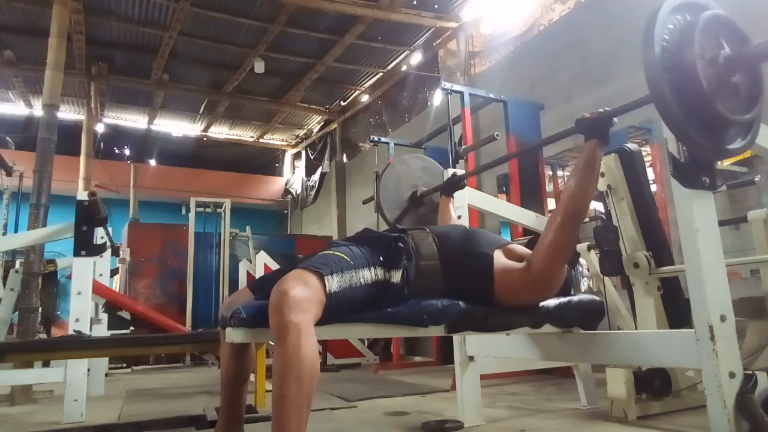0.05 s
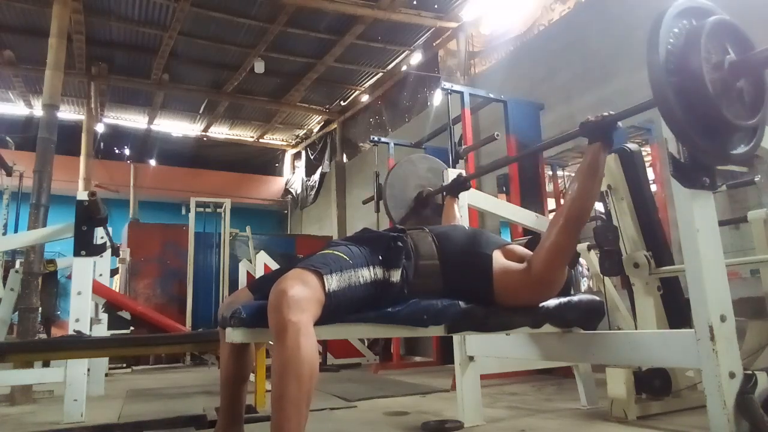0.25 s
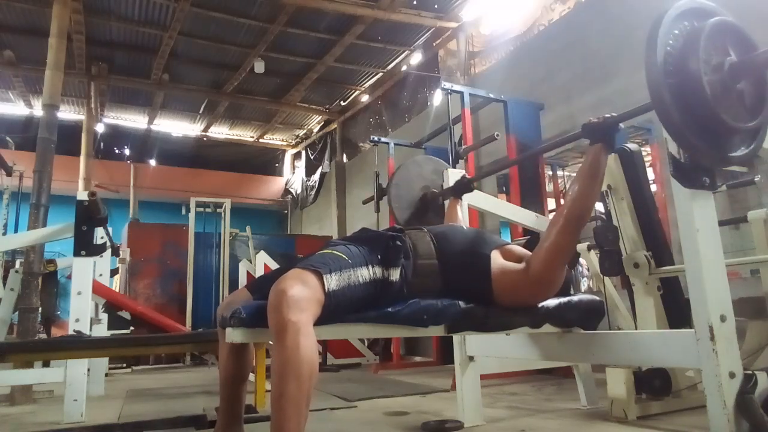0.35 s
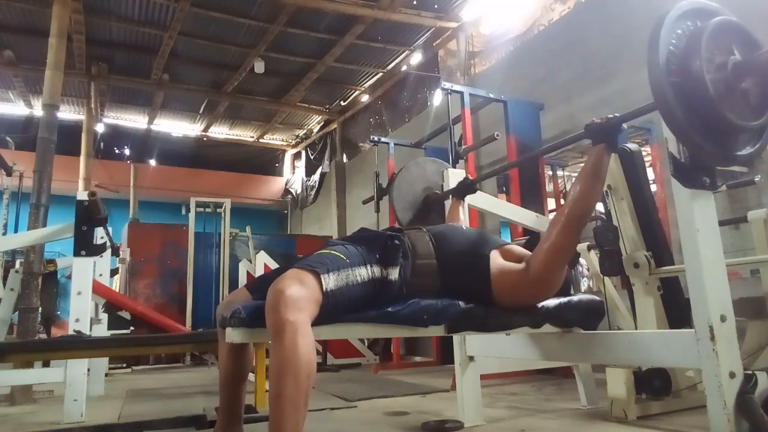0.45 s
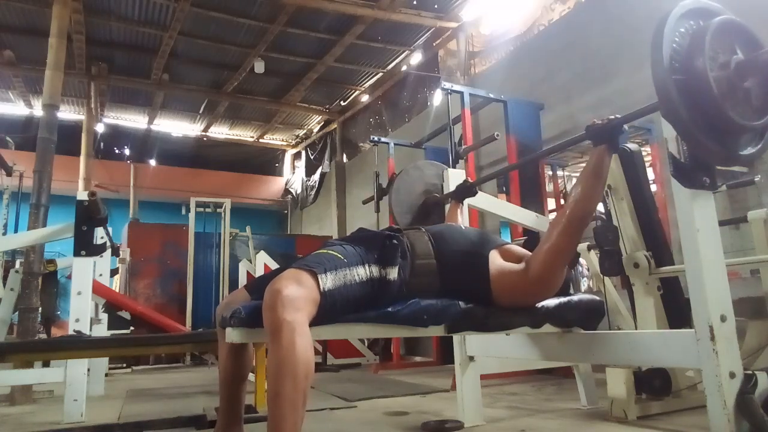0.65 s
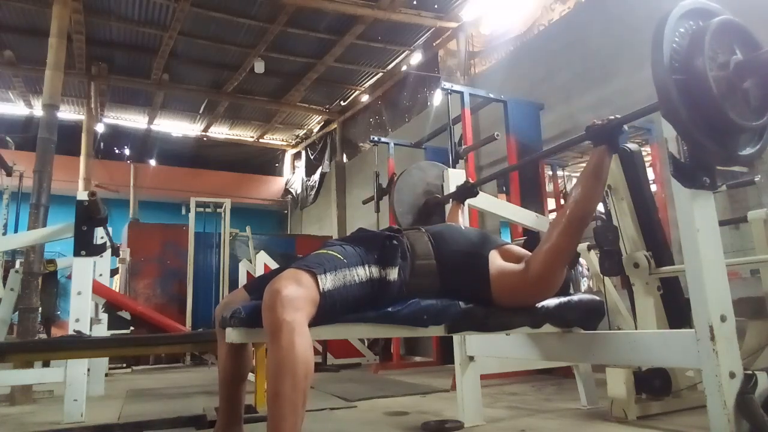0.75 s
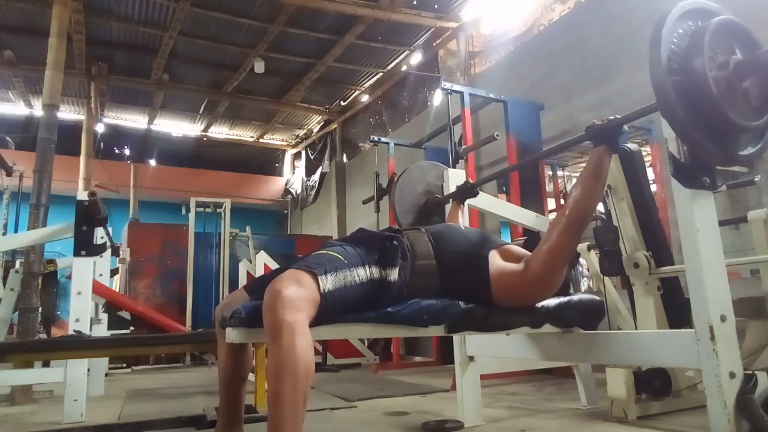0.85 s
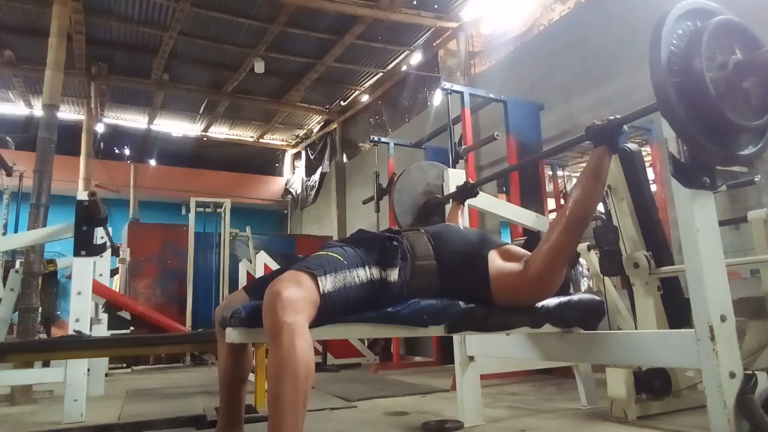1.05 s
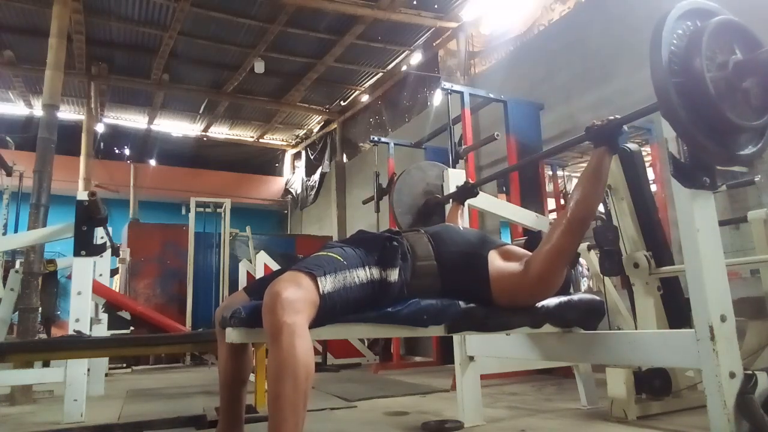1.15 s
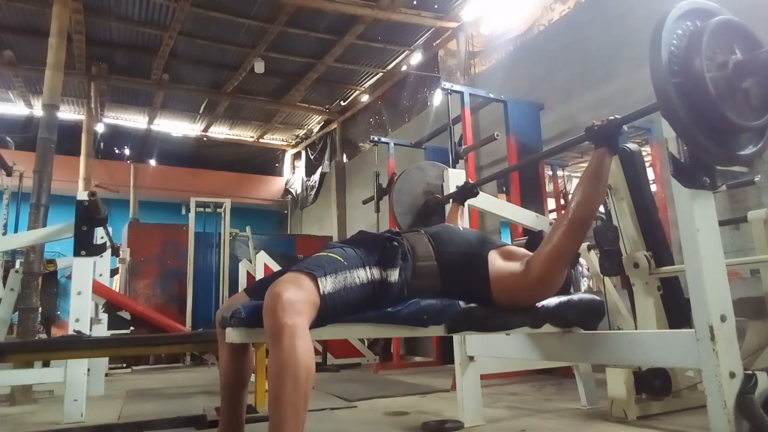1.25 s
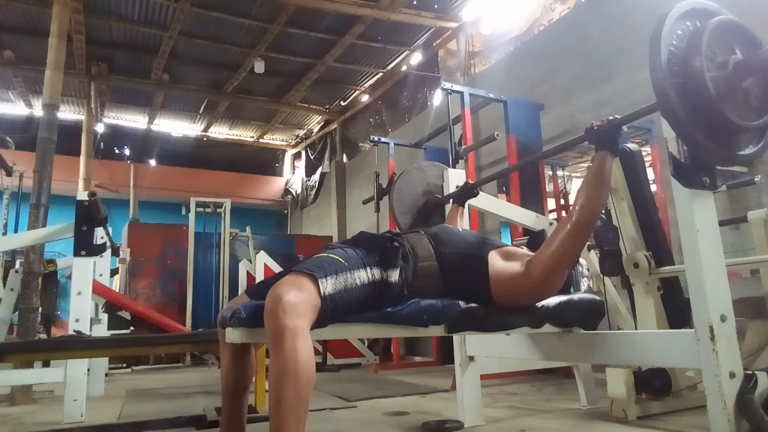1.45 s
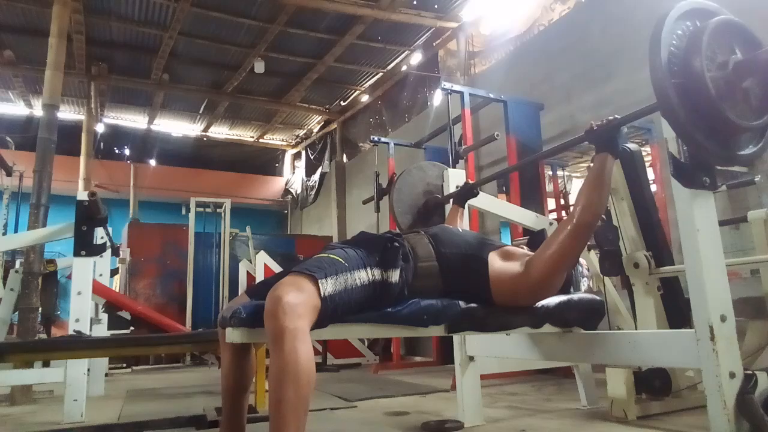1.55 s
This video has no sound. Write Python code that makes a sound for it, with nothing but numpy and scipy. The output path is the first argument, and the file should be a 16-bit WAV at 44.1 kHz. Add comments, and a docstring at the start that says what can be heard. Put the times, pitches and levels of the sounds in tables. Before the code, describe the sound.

A loaded barbell is set back on a steel rack. After quiet low rumble and faint hiss, sharp clanks begin at about 0.2 s with dull frame knocks. Harder, brighter clangs land near 0.5 s and 0.8 s, each followed by quick plate clatter, with a last clink just before 1 s. Metallic ringing and diffuse gym reverberation then die away over a wavering low hum.

```python
"""A loaded barbell is set back on a steel bench rack in a large gym under a metal roof.
A low rumble, a faint hiss and a wavering hum lie under it all: coloured noise and one sine.
The bar bumps the uprights, then drops into one hook and the other; the loose plates clatter after each.
Each contact is a crack of noise that also sets decaying sines ringing, and the frame adds dull knocks.
Bar, plates and rack ring on, and the hall carries the cracks on as a diffuse tail."""
import sys
import numpy as np
from scipy import signal
from scipy.fft import rfft, irfft
from scipy.io import wavfile

SR = 44100
rng = np.random.default_rng(int(sys.argv[2]) if len(sys.argv) > 2 else 0)


def store_wav(level_fs):
    """Save 16-bit WAV to argv[1]."""
    pcm = np.round(np.clip(np.atleast_2d(level_fs), -1, 1) * 32767)
    wavfile.write(sys.argv[1], SR, pcm.T.astype(np.int16))


N = 70560   # samples, 1.6 s
TIME = np.arange(N) / SR


def from_db(db):
    """Turn decibels into an amplitude factor."""
    return 10 ** (np.asarray(db) / 20)


def rms_one(x):
    """Scale a signal to rms 1."""
    return x / np.sqrt(np.mean(x ** 2) + 1e-20)


def at_hz(points, hz):
    """Read a table on a log-frequency axis."""
    points = np.array(points)
    return np.interp(np.log(hz), np.log(points[:, 0]), points[:, 1])


def dying(t60):
    """Envelope that falls 60 dB in t60 seconds."""
    return np.exp(-np.log(1000) * TIME / t60)


def add(out, sound, start_s):
    """Mix a sound in from start_s."""
    start = int(start_s * SR)
    out[start:] += sound[:N - start]


def bandpass(sound, band_hz):
    """Let one band of frequencies through."""
    return signal.sosfilt(signal.butter(2, band_hz, "band", fs=SR, output="sos"), sound)


def noise_bands(colour, size=N):
    """Quarter-octave bands of noise with the given colour, together rms 1: centres, bands."""
    edges = 22 * 2 ** (np.arange(39) / 4)
    centres = np.sqrt(edges[1:] * edges[:-1])
    # neighbouring bands take turns on three noises; the first second lets the filters settle
    white = rng.standard_normal((3, size + SR))
    bands = []
    for k in range(len(centres)):
        band = bandpass(white[k % len(white)], edges[k:k + 2])
        bands.append(rms_one(band[SR:]))
    # from level per Hz to level per band
    gains = from_db(at_hz(colour, centres)) * np.sqrt(np.diff(edges))
    gains /= np.linalg.norm(gains)
    return centres, np.array(bands) * gains[:, None]


# borders between thud, clang, clash and sizzle: pitch_hz
CROSSOVERS_HZ = (915, 2480, 7800)
FAVOUR_DB, FAVOUR_OCTAVES = 7.5, .14   # lift and width of the region that the spot struck favours


def strength(contact, hz):
    """How hard a contact drives each frequency: four blended ranges and a favoured region."""
    _, *ranges_db, favoured_hz = contact
    octaves_away = np.log2(hz / favoured_hz)
    db = ranges_db[0] + FAVOUR_DB * np.exp(-.5 * (octaves_away / FAVOUR_OCTAVES) ** 2)
    for step_db, edge_hz in zip(np.diff(ranges_db), CROSSOVERS_HZ):
        db = db + step_db / (1 + (edge_hz / hz) ** 8)
    return from_db(db)


CRACK_PATCH_DB, CRACK_PATCH_WIDTH_HZ = 3.5, 120


def uneven(sound):
    """Give a crack and its tail narrow peaks and dips at random frequencies."""
    spectrum = rfft(sound)
    place = np.fft.rfftfreq(N, 1 / SR) / CRACK_PATCH_WIDTH_HZ
    patch = rng.standard_normal(size=512)
    patch_db = CRACK_PATCH_DB * np.interp(place, np.arange(len(patch)), patch)
    return irfft(spectrum * from_db(patch_db), N)


# steel meets steel: start_s, thud_db, clang_db, clash_db, sizzle_db, favoured_hz
CONTACTS = [(0.2161, -3.5, -11, -8.5, -33, 1430), (0.2275, -8.5, -10.5, -7, -10.5, 1670),
            (0.248, -7, -2, -33, -30, 1740), (0.2775, -5, -8.5, -14.5, -20, 4180),
            (0.316, -2, -11, -15.5, -36, 1730), (0.405, -12, -11, -19.5, -41, 1500),
            (0.488, -28, -26, -7, -23, 3170), (0.4908, -8, 1.5, 2, -12.5, 1370),
            (0.505, -6.5, -1, 2.5, -1.5, 13000), (0.533, -1, -1, -6, -5.5, 1890),
            (0.578, -4.5, -1, -4.5, -13, 820), (0.688, -25, -5, -16, -26, 1290),
            (0.701, -3, -11.5, -12, -28, 1680), (0.727, -6.5, -13, -10, -20, 1420),
            (0.8005, -17, 1, 0, -23, 1460), (0.818, -5, -6, -5, -11.5, 1670),
            (0.858, -11, -6, -19, -32, 1500), (0.985, -15.5, -13.5, -14.5, -34, 1750)]
# basic colour of a blow: pitch_hz, level_db (per Hz)
BLOW_COLOUR = [(60, -26), (130, 1), (220, -1), (400, -3), (600, -4), (730, -13.5), (870, -0.5),
               (1050, -2.5), (1300, -1.5), (1650, -2), (2100, -4.5), (3000, -7), (4200, -12), (5000, -12.5),
               (6100, -11.5), (7000, -56), (8500, -35), (10500, -28), (11800, -55), (14000, -38),
               (16000, -52)]
# how long the hall carries each pitch: pitch_hz, t60_s
HALL_T60 = [(150, 0.71), (500, 1.45), (1500, 0.98), (4000, 0.98), (6500, 0.78), (12000, 0.33)]
CRACK_DB, CRACK_T60_S, CONTACT_RISE_S = -12.5, 0.065, 0.00027
HALL_DB, HALL_BUILD_S = -19, 0.0081


def clatter():
    """Every contact is a short crack of noise, which the hall carries on as a diffuse tail."""
    hz, bands = noise_bands(BLOW_COLOUR, size=2 * N)
    tails = np.array([dying(t60) for t60 in at_hz(HALL_T60, hz)])
    tails *= 1 - np.exp(-TIME / HALL_BUILD_S)
    # low bands need longer to rise
    rise = 1 - np.exp(-(TIME / (CONTACT_RISE_S + .5 / hz[:, None])) ** 2)
    envelopes = rise * (from_db(CRACK_DB) * dying(CRACK_T60_S) + from_db(HALL_DB) * tails)
    out = np.zeros(N)
    for k, contact in enumerate(CONTACTS):
        # each contact reads the noise from another place
        first = N - k * N // len(CONTACTS)
        own_noise = bands[:, first:first + N]
        blow = strength(contact, hz) @ (own_noise * envelopes)
        add(out, uneven(blow), contact[0])
    return out


def ring(clicks, hz, t60):
    """A resonance: a unit click sets a decaying sine of starting height 1 ringing."""
    r, w = np.exp(-np.log(1000) / (t60 * SR)), 2 * np.pi * hz / SR
    return signal.lfilter([0, np.sin(w)], [1, -2 * r * np.cos(w), r * r], clicks + 1e-18)


PATCH_DB, PATCH_WIDTH_HZ = 3.5, 260   # a blow catches some groups of neighbouring modes harder
MODE_SPREAD_DB = 2   # random spread of each mode at each blow


def struck(modes):
    """All contacts strike the same modes, each time with somewhat different weights and timing."""
    out, starts, pitches = np.zeros(N), np.array(CONTACTS)[:, 0], np.array(modes)[:, 0]
    patches = rng.standard_normal((len(CONTACTS), 128))
    drive = []
    for contact, patch in zip(CONTACTS, patches):
        patch_db = PATCH_DB * np.interp(pitches / PATCH_WIDTH_HZ, np.arange(len(patch)), patch)
        drive.append(strength(contact, pitches) * from_db(patch_db))
    for (hz, db, t60), gains in zip(modes, np.array(drive).T):
        clicks = np.zeros(N)
        # up to one period late
        at = ((starts + rng.random(len(starts)) / hz) * SR).astype(int)
        clicks[at] = gains * from_db(db + MODE_SPREAD_DB * rng.standard_normal(len(at)))
        # taking away a very short ring softens the onset
        out += ring(clicks, hz, t60) - ring(clicks, hz, np.log(1000) * CONTACT_RISE_S)
    return out


# ringing of the bar: pitch_hz, level_db, t60_s
BAR_MODES = [(582, -4.5, 1.3), (846, -2, 1.1), (1109.5, 2, .6), (1188.6, -.5, .95), (1259, -3, .75),
             (1325.5, -1, .7), (1383, -3, .65), (1419, -2, .65), (1576, -4, .85), (1599.5, -2, .75),
             (1670, -6.5, .9), (1769.5, -2, .85), (1839, 0, .65), (1964, 1, .7)]


def bar():
    """The bar rings in its own modes, as decaying sines."""
    return from_db(-30) * struck(BAR_MODES)


# ringing of the plates: pitch_hz, level_db, t60_s
PLATE_MODES = [(2266.5, -4, .75), (2351, -4, .65), (2402, -6, .9), (2457, -5, 1.0), (3020, -8, .75),
               (3262, -8, .9), (4000, -11, .6), (4102, -10, .65), (4317, -10, .7), (5443, -16, .7),
               (5712, -15, .7), (6164, -17, .7), (7515, -28, .9)]


def plates():
    """The plates ring in their own, higher modes, as decaying sines."""
    return from_db(-28.5) * struck(PLATE_MODES)


# clusters of close upper modes: pitch_hz, level_db
SHIMMER = [(2500, -3), (4300, 2), (5000, -15), (6100, 3), (7000, -31), (8600, -32), (9500, -14),
           (9950, -21), (10500, -11.5), (11900, -30), (12500, -15), (13100, -23), (14000, -20),
           (15700, -28)]
# how long they ring: pitch_hz, t60_s
SHIMMER_T60 = [(2500, 0.86), (6500, 0.55), (10000, 0.59), (15000, 0.47)]
SHIMMER_DB = -23.5


def shimmer(count=420):
    """The many close upper modes of plates and rack, slightly scattered in pitch."""
    hz = np.linspace(SHIMMER[0][0], SHIMMER[-1][0], count)
    hz = hz * (1 + 0.0056 * rng.standard_normal(count))
    db = at_hz(SHIMMER, hz)
    db -= 20 * np.log10(np.linalg.norm(from_db(db)))   # all modes together at 0 dB
    modes = list(zip(hz, db, at_hz(SHIMMER_T60, hz)))
    return from_db(SHIMMER_DB) * struck(modes)


# the rack frame takes the weight with a knock: start_s, level_db
KNOCKS = [(0.2144, -15.5), (0.272, -14.5), (0.403, -18.5), (0.503, -15.5), (0.699, -12), (0.862, -13.5)]
# resonances of the frame: pitch_hz, level_db, t60_s
FRAME_MODES = [(163.5, -4, 0.092), (224.8, -3.5, .09), (290.6, -4, 0.048)]
# band of the push that drives them: lowest_hz, highest_hz
FRAME_BAND_HZ = (104, 360)


def frame():
    """Dull knocks of the rack frame: band-limited pushes set its low, short resonances going."""
    clicks = np.zeros(N)
    for start_s, db in KNOCKS:
        clicks[int(start_s * SR)] = from_db(db)
    push = bandpass(clicks + 1e-18, FRAME_BAND_HZ)
    return sum(from_db(db) * ring(push, hz, t60) for hz, db, t60 in FRAME_MODES)


# swell and fade of the hum: time_s, level_db
HUM_LEVEL = [(0, -44.5), (.4, -32.5), (.7, -26), (1.0, -29.5), (1.3, -34), (1.6, -59)]
HUM_HZ, HUM_WAVER_DB = 159.9, -2   # the waver scales a slow random curve of rms 1


def hum():
    """A low sine that wavers in level, swells and fades."""
    waver = rms_one(signal.resample(rng.standard_normal(size=12), N))
    level_db = np.interp(TIME, *np.transpose(HUM_LEVEL)) + HUM_WAVER_DB * waver
    return from_db(level_db) * np.sin(2 * np.pi * HUM_HZ * TIME)


# colour of the hall's background: pitch_hz, level_db (per Hz)
AIR_COLOUR = [(25, -23), (50, -24), (75, -9.5), (105, -4), (140, 3), (175, -6), (230, -10), (400, -19.5),
              (700, -22), (1300, -20), (2000, -31), (2500, -28), (4000, -42), (5600, -36.5), (8000, -69),
              (11000, -61), (16000, -66)]
AIR_DB, HISS_ABOVE_HZ = -32, 700
RUMBLE_FADE_DB_PER_S, HISS_FADE_DB_PER_S = 0.5, 3


def air():
    """Low rumble and faint hiss: coloured noise that slowly sinks, the hiss faster."""
    hz, bands = noise_bands(AIR_COLOUR)
    high = hz > HISS_ABOVE_HZ
    rumble = bands[~high].sum(axis=0) * from_db(-RUMBLE_FADE_DB_PER_S * TIME)
    hiss = bands[high].sum(axis=0) * from_db(-HISS_FADE_DB_PER_S * TIME)
    return from_db(AIR_DB) * (rumble + hiss)


def scene():
    """Barbell and rack in the hall, one channel."""
    ringing = bar() + plates() + shimmer()
    background = air() + hum()
    return (background + clatter() + ringing + frame())[None]


CUTOFF_HZ, FADE_IN_S = 15700, .004


def record(dry):
    """Round the highest peaks, fade in briefly and cut the top steeply."""
    rounded = 1.3 * np.tanh(dry / 1.3)
    faded = rounded * np.minimum(TIME / FADE_IN_S, 1)
    return signal.sosfilt(signal.ellip(12, .1, 90, CUTOFF_HZ, fs=SR, output="sos"), faded)


dry = scene()
out = record(dry)
store_wav(out)
```